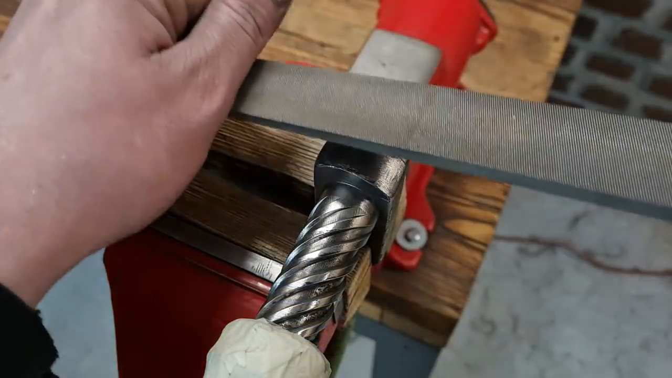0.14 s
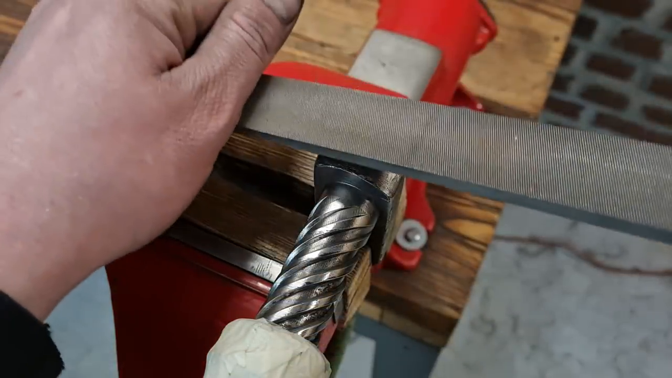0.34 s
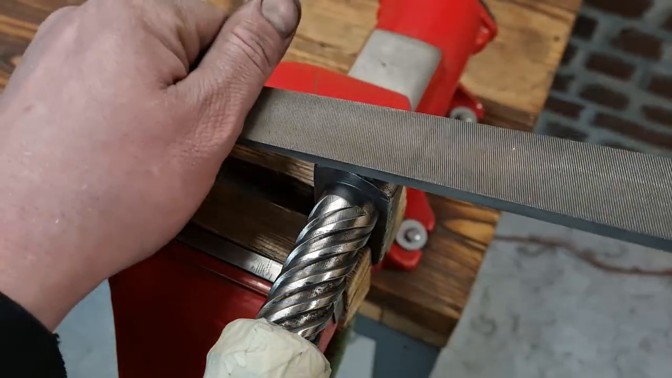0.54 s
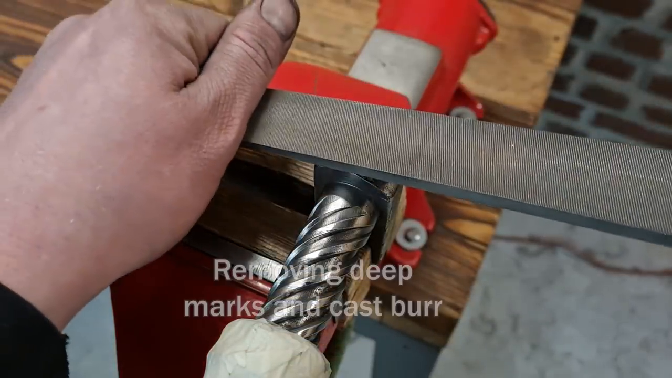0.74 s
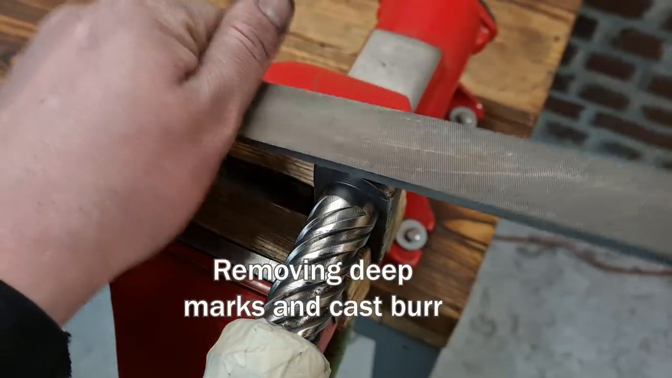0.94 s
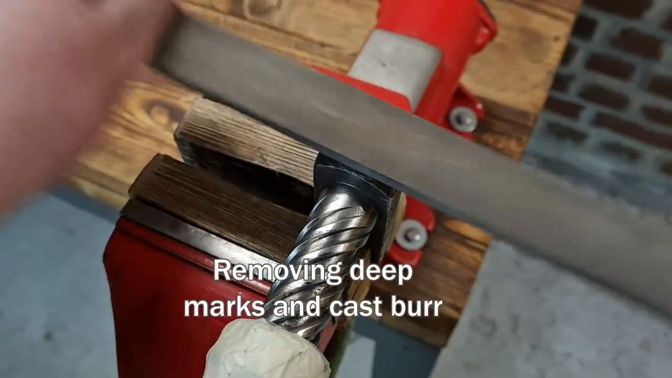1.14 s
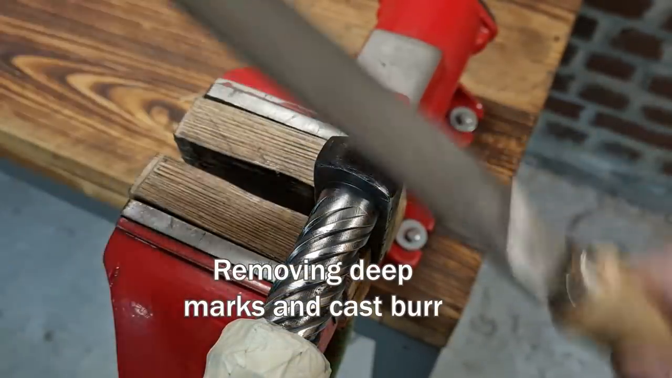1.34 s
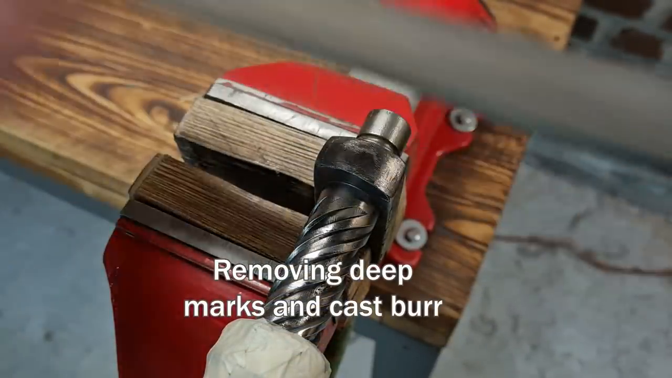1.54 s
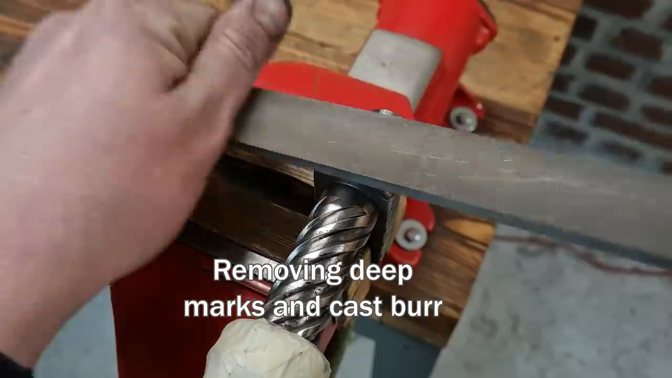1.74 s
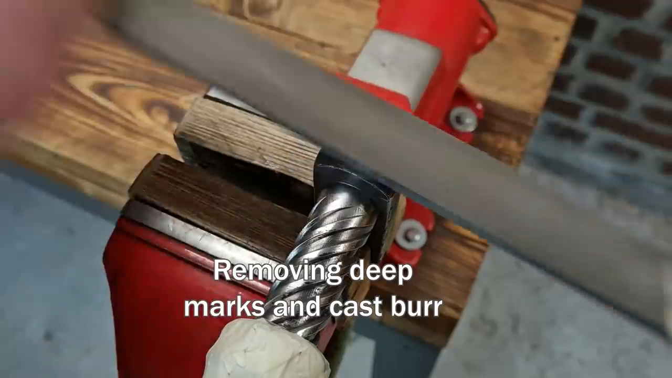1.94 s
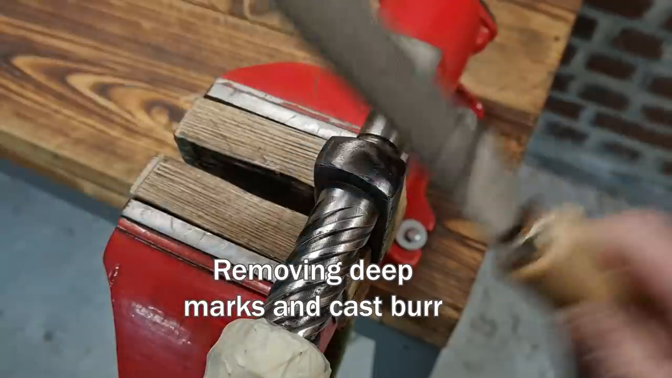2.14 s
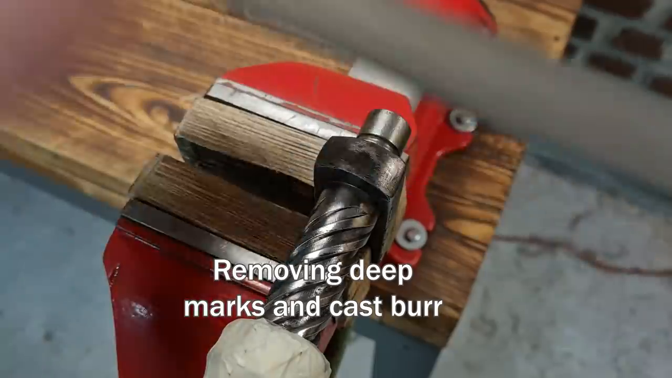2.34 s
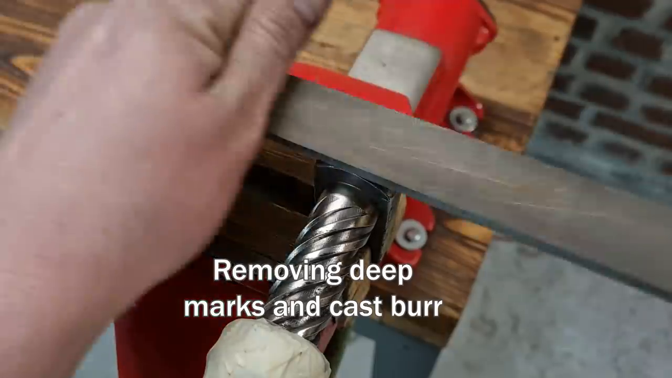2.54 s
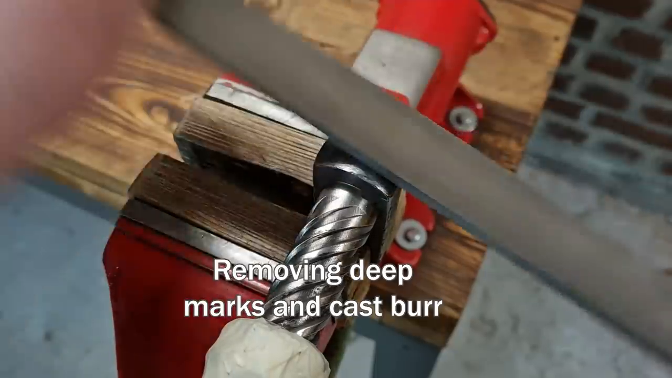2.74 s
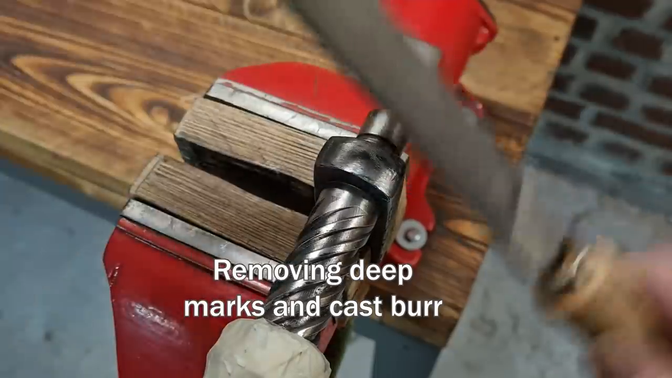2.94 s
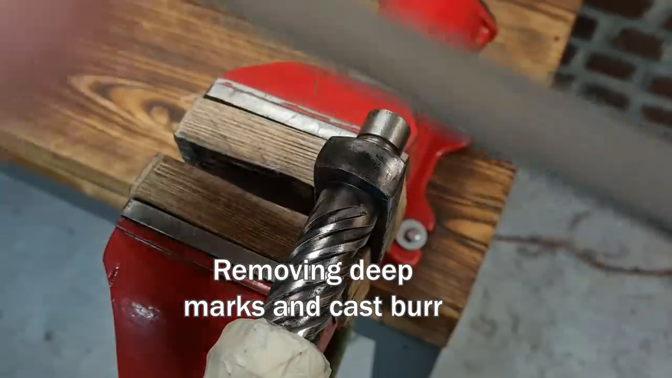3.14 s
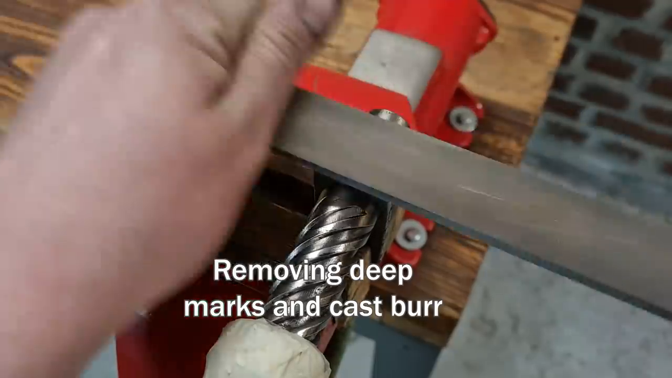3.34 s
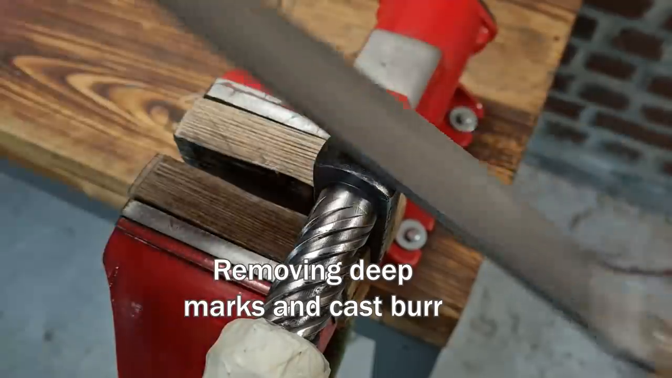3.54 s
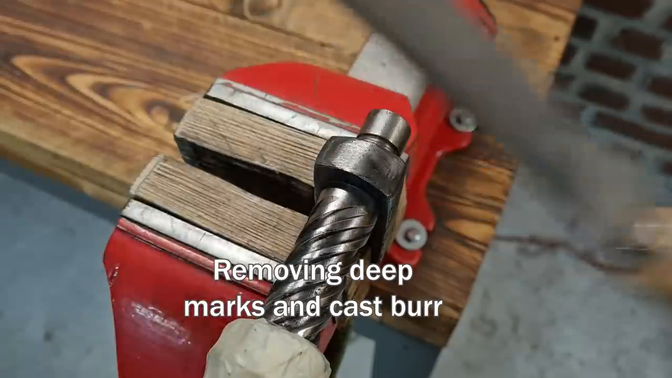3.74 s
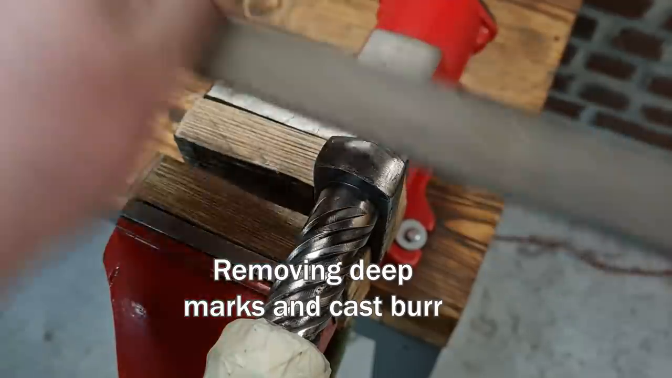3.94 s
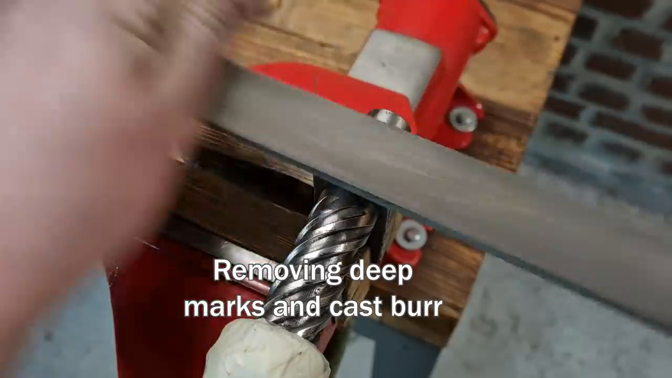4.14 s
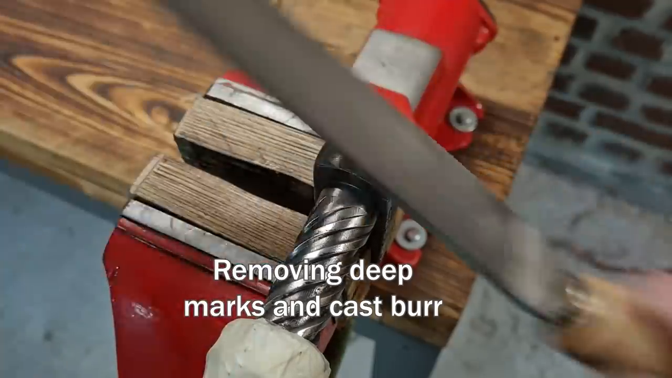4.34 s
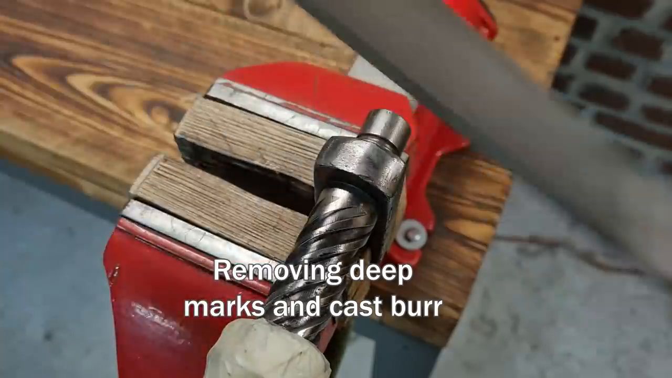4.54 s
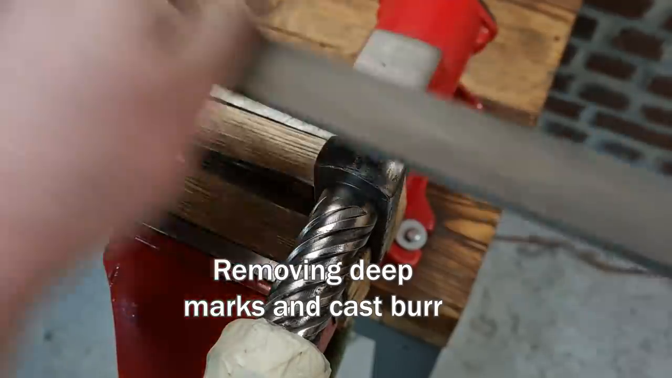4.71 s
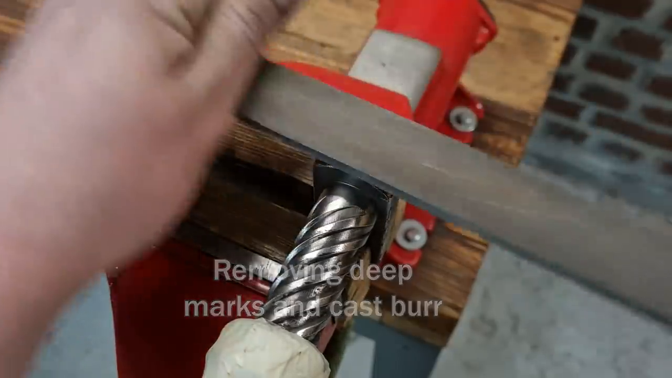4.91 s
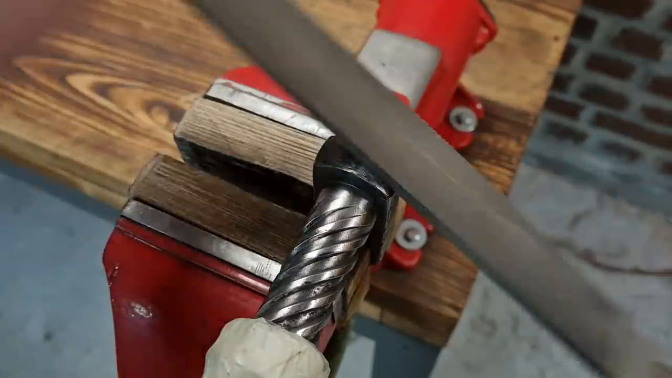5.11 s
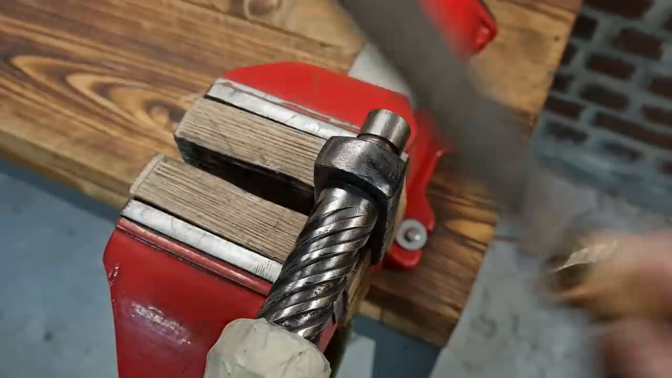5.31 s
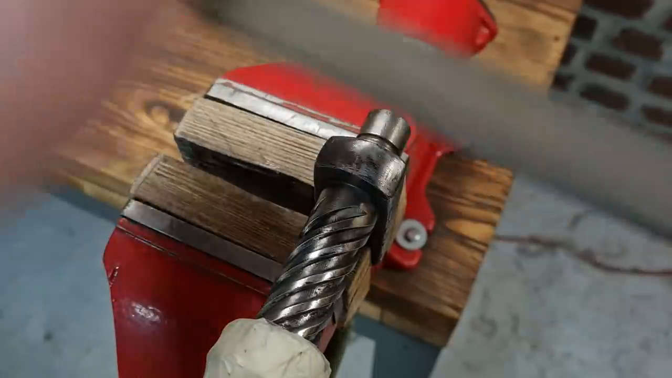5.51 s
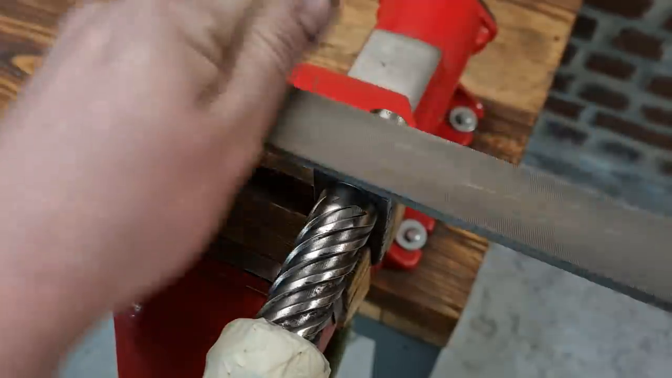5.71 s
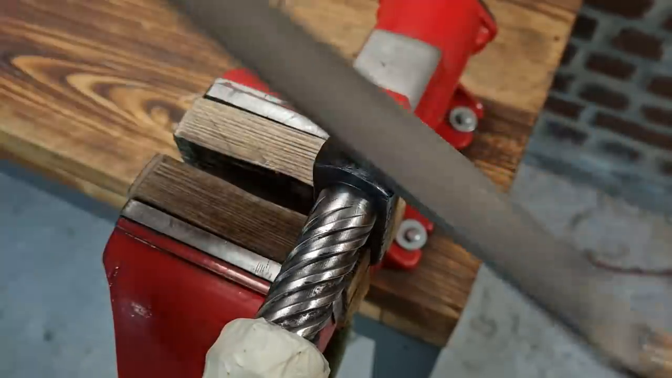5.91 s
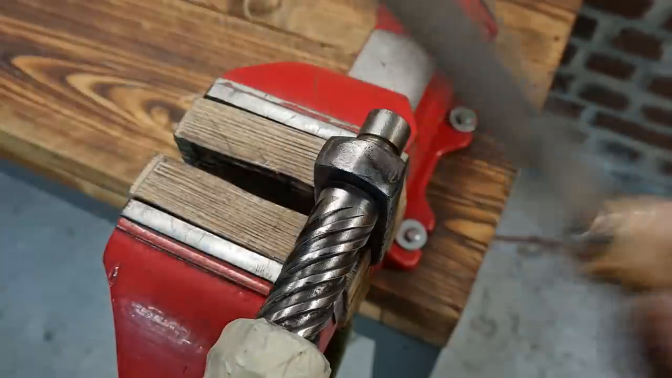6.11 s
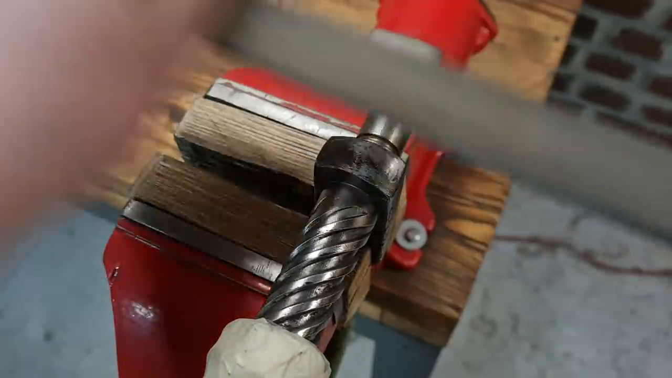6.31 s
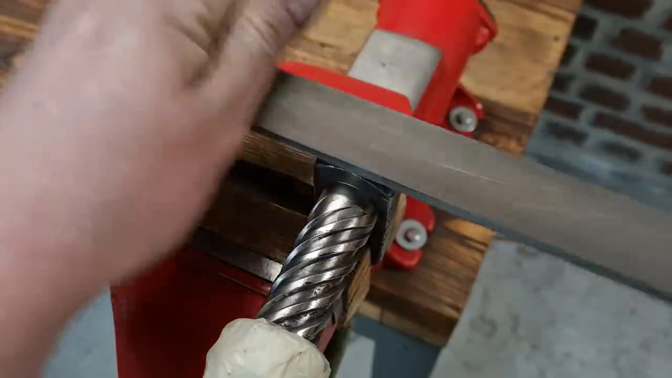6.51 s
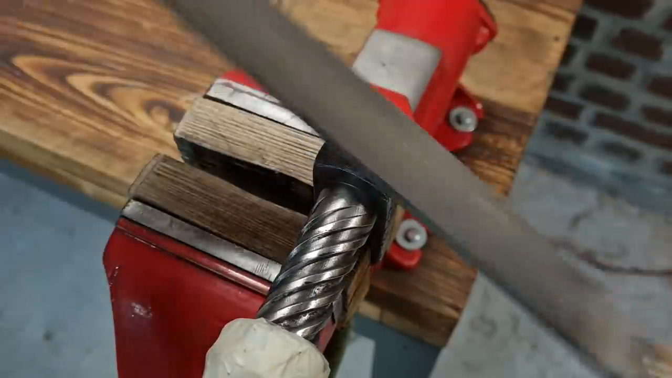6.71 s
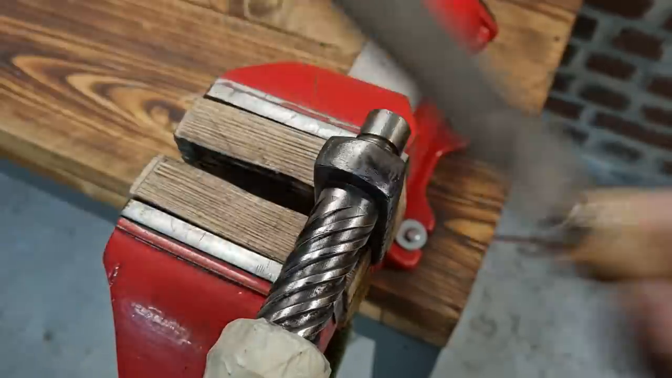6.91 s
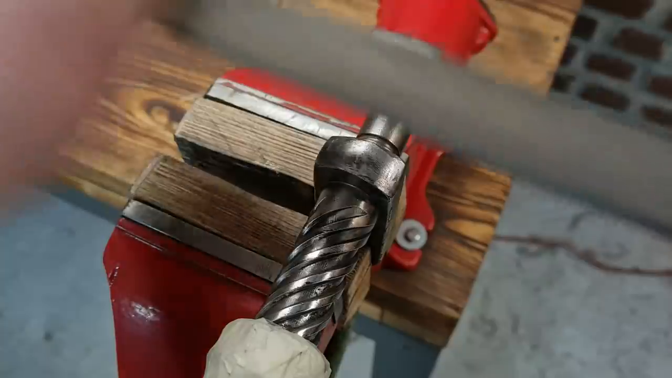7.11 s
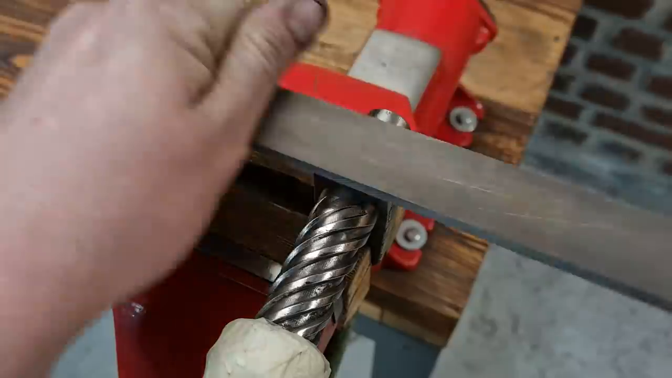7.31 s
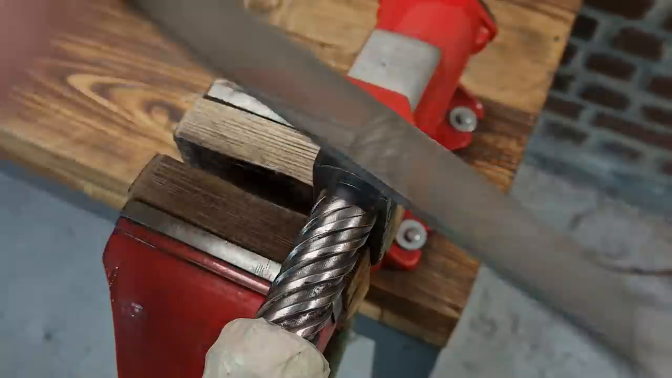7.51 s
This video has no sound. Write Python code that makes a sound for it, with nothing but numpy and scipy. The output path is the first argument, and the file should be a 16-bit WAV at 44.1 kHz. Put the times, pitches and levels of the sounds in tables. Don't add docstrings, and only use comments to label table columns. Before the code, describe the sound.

A flat steel file clacks down on a clamped metal part and rasps across it in nine evenly spaced pushes, close up in a workshop.

```python
import sys
import numpy as np
from scipy import signal
from scipy.fft import rfft, irfft, next_fast_len
from scipy.io import wavfile
from scipy.ndimage import uniform_filter1d, map_coordinates

SR = 44100
rng = np.random.default_rng(int(sys.argv[2]) if len(sys.argv) > 2 else 0)


def nominal_scale(level):
    x = np.asarray(level, float) / 20
    return 10 ** x


def log_audio(samples):
    frames = np.atleast_2d(samples).T
    limited = np.clip(frames, -1, 1)
    pcm = np.round(limited * 32767).astype(np.int16)
    wavfile.write(sys.argv[1], SR, pcm)


N = 333396


def unit(x):
    return x / np.sqrt(np.mean(x ** 2) + 1e-20)


def along(points, hz):
    f, v = np.transpose(points)
    return np.interp(np.log(hz + 1), np.log(f + 1), v)


def filtered(x, response):
    n = x.shape[-1]
    m = next_fast_len(n + min(n, SR // 2))
    return irfft(rfft(x, m) * response(np.fft.rfftfreq(m, 1 / SR)), m)[..., :n]


def causal(points):
    grid = np.linspace(0, 1, 129)
    doubled_db = 2 * along(points, grid * SR / 2)
    return signal.minimum_phase(signal.firwin2(255, grid, nominal_scale(doubled_db)))


# f/Hz, phase/rad
PORT_LAG = [(60, 0.36), (130, 0.31), (300, 0.087), (700, 1.1), (1500, 1.78), (3000, 3.47)]


def modes(table, scatter_db=0):
    late = rng.permuted(np.tile([0, 1], (len(table), 1)), axis=1)
    gains = nominal_scale(scatter_db * rng.standard_normal((len(table), 2, 1)))

    def response(hz):
        f = hz[hz < 10 * max(table)[0]]
        total = 0
        for k, (centre, width, db) in enumerate(table):
            bell = 1j * f * width / (centre ** 2 - f ** 2 + 1j * f * width)
            early = (-1) ** k * nominal_scale(db) * bell
            delayed = early * np.exp(-1j * along(PORT_LAG, centre) * f / centre)
            total = total + gains[k] * np.array([early, delayed])[late[k]]
        fade = np.cos(np.pi / 2 * f / f[-1]) ** 2
        return np.pad(total * fade, [(0, 0), (0, len(hz) - len(f))])
    return response


def driven(force, gain, response):
    reference = np.std(filtered(force[..., 3 * SR:4 * SR], response))
    return filtered(force * gain, response) / reference


def patchy(x, depth_db, tall, long, climb=0):
    z = signal.stft(x, nperseg=256)[2]
    field = rng.standard_normal(z.shape[-2:])
    field = uniform_filter1d(uniform_filter1d(field, tall, 0), long, 1)
    rows, steps = np.indices(field.shape)
    field = field[(rows - (climb * steps).astype(int)) % len(rows), steps]
    return signal.istft(z * nominal_scale(depth_db * unit(field)), nperseg=256)[1][..., :N]


def swept(x, centre_hz, width_hz, lift_db):
    hz, t, z = signal.stft(x, SR, nperseg=256)
    centre = centre_hz[np.minimum((t * SR).astype(int), N - 1)]
    lift = nominal_scale(lift_db / (1 + ((hz[:, None] - centre) / width_hz) ** 2))
    return signal.istft(z * lift, nperseg=256)[1][..., :N]


def grit(spread_db):
    size = nominal_scale(spread_db * rng.standard_normal(N))
    return unit(rng.standard_normal((2, N)) * size)


def spans(table):
    t = np.arange(N) / SR
    start, length = np.transpose(table)[:2]
    row = np.maximum(np.searchsorted(start, t) - 1, 0)
    share = (t - start[row]) / length[row]
    touching = ((share >= 0) & (share < 1)) * 1.
    return uniform_filter1d(touching, size=400), row, np.clip(share, 0, 1)


# f/Hz, level/dB
AIR_COLOUR = [(15, -33), (25, -5.5), (87, 2.5), (166, -19.5), (293, -9.5), (659, -30.5), (1400, -27.5),
              (1520, -26.5), (4030, -33), (7110, -19), (8360, -31.5), (11600, -25.5), (12500, -35),
              (16000, -39)]
# t/s, level/dB
HUSH = [(0, -1), (0.138, -2.5), (.32, 2), (.45, -15), (0.521, -21), (.62, 8), (1.6, 0), (1.72, -4.5),
        (7.56, -4)]


def air():
    pair = rng.standard_normal((2, N))
    level_db = -74.5 + np.interp(np.arange(N) / SR, *np.transpose(HUSH))
    noise = patchy(pair + pair[0], 1.1, 3, 20)
    return nominal_scale(level_db) * unit(filtered(noise, lambda f: nominal_scale(along(AIR_COLOUR, f))))


# f/Hz, t60/s
DECAY = [(60, 0.92), (300, 0.57), (1000, 0.36), (4000, 0.34), (12000, 0.39)]
# f/Hz, level/dB
WALL_RETURN = [(100, -0.5), (1000, 2.5), (2200, -6), (4000, -10.5), (8000, -12), (14000, -22)]


def workshop(x):
    out, step = np.zeros((2, N + 2 * SR)), SR // 4
    for start in range(0, N, step):
        hz, t, z = signal.stft(rng.standard_normal((2, SR // 2)), SR, nperseg=256)
        tail = signal.istft(z * nominal_scale(-60 * t / along(DECAY, hz)[:, None]), SR, nperseg=256)[1]
        tail = tail / np.linalg.norm(tail[0])
        wet = signal.fftconvolve(x[:, start:start + step], tail, axes=1)
        out[:, start + 260:][:, :wet.shape[1]] += wet
    out = out[:, :N]
    side = out.mean(0) - out
    out = out + filtered(side, lambda f: 1 / (1 + (f / 450) ** 2))
    return filtered(out, lambda f: nominal_scale(along(WALL_RETURN, f)))


# t/s, length/s, rub level/dB, creak level/dB, swell over the rest/dB
RESTS = [
    (0.203, 0.4, -75, -73.5, 11),
    (0.61, 0.27, -68, -73, -12.5),
    (0.916, 0.068, -71, -80, 5.5),
    (1.668, 0.092, -84, -79, 2.5),
    (7.231, 0.045, -65.5, -58, 8),
]
# f/Hz, width/Hz, level/dB
RUB = [(1500, 300, 12), (2072, 290, 1.2), (2550, 220, 12)]
# f/Hz, width/Hz, level/dB
CREAK = [(230, 130, -8.5), (310, 39, 5.5), (430, 72, -0.5), (553, 230, -14.5)]


def resting():
    touch, row, share = spans(RESTS)
    rub_db, creak_db, swell_db = np.transpose(RESTS)[2:, row]
    gain = touch * nominal_scale(swell_db * (share - 0.5))
    steel = modes(RUB)
    rub_force = patchy(grit(spread_db=4.5), 2.5, 3, 16)
    rub = driven(rub_force, gain * nominal_scale(rub_db), lambda f: steel(f) ** 2)
    creak_force = patchy(grit(spread_db=0)[0], 4.7, 2, 16)
    return rub + driven(creak_force, gain * nominal_scale(creak_db), modes(CREAK))


# f/Hz, level/dB
CLICK = [(150, -40.5), (1200, -7), (2200, 3), (5000, 8.5), (7500, 0.5), (9000, -20.5), (13000, -46.5),
         (22000, -77.5)]
# f/Hz, level/dB
EDGE = [(5000, -39.5), (9000, -11), (12800, 6.5), (15500, -4), (17000, -37), (22000, -54)]
# f/Hz, width/Hz, level/dB
LOOSE = [(1363, 67, 19), (2140, 160, -3.5), (2410, 99, 0.5), (3770, 140, 2), (4628, 50, -5), (5250, 180, 1),
         (5510, 66, -4), (5870, 120, -13.5), (7000, 71, 12.5)]


def contacts(table, first, crack_s, ring_db, centre_db):
    crack = np.zeros((2, N + SR))
    t = np.arange(4000) / SR
    body, edge = causal(CLICK), causal(EDGE)

    def peak(x):
        return x / np.abs(x).max(1, keepdims=True)

    for s, db, pan_db, hz, edge_db in table:
        burst = rng.standard_normal((2, len(t))) + first * (t == 0)
        burst = burst * nominal_scale(-60 * t / crack_s)
        ring = modes(LOOSE + [(hz, 190, centre_db)], scatter_db=3)
        click = peak(signal.lfilter(body, 1, burst + nominal_scale(ring_db) * filtered(burst, ring)))
        sparkle = rng.standard_normal((2, len(t))) * nominal_scale(-60 * t / 0.024)
        click += nominal_scale(edge_db) * peak(signal.lfilter(edge, 1, sparkle))
        pan = np.array([[.5], [-.5]]) * pan_db
        crack[:, round(s * SR):][:, :len(t)] += nominal_scale(db + pan) * click
    return crack[:, :N]


# t/s, peak level/dB, left-right/dB, bright centre f/Hz, edge level re peak/dB
SCUFFS = [
    (0.74, -51.5, -11, 6800, -10),
    (0.862, -64, -14, 4850, 3),
]
TICKS = [
    (0.197, -59.5, -29.5, 2170, -4),
    (0.2194, -90, -4, 4050, -19),
    (0.2985, -46, -7.5, 2147, -11),
    (0.3194, -75, -11, 2430, -21),
    (0.634, -45.5, -7, 5200, -10),
    (0.6554, -47, -5, 4040, -7),
    (0.6804, -47.5, 3, 2300, -7),
    (4.6842, -67.5, -1, 7350, 6),
    (4.6964, -72, 10.5, 7300, -6),
    (7.2396, -68.5, -7, 2860, -15),
]
TAP = [
    (0.5352, -17.5, -16, 2240, -25),
]


def light_touches():
    touches = contacts(SCUFFS, first=0, crack_s=0.12, ring_db=8, centre_db=15)
    touches += contacts(TICKS, first=0.6, crack_s=0.022, ring_db=-6, centre_db=16)
    return touches + contacts(TAP, first=5.9, crack_s=0.007, ring_db=0, centre_db=27)


# t/s, peak level/dB, left-right/dB, bright centre f/Hz, edge level re peak/dB
LANDINGS = [
    (1.7394, -5.5, -9.5, 4300, -19.5),
    (2.5365, -7, -1, 3530, -30),
    (3.3157, -6.5, -2.5, 2300, -33),
    (4.0704, -5.5, -6, 4420, -18),
    (4.8246, -5.5, -3.5, 2310, -40.5),
    (5.664, -4, 8.5, 7000, -32),
    (6.4473, -5.5, -5, 6730, -36),
    (7.2818, -11, -12.5, 2360, -30),
]


def landings():
    return contacts(LANDINGS, first=5, crack_s=0.008, ring_db=6, centre_db=4)


# t/s, level/dB
KNOCKS = [
    (0.5352, -12),
    (0.197, -70),
    (0.2985, -66),
    (0.6554, -26.5),
    (7.2396, -42),
]
# f/Hz, width/Hz, level/dB
PART = [(509.4, 32, -12.5), (529.5, 11, -1), (577, 82, -4), (662.6, 37, -4), (729, 20, -4.5),
        (762.5, 5.2, -4.5), (835.5, 73, -10), (1170.5, 53.4, -6), (1374.5, 39.5, -4.5), (1530, 58, -0.5),
        (1648, 49, -9.5), (1880, 360, -14.5)]
# f/Hz, width/Hz, level/dB
BENCH = [(123.3, 5.1, 3), (174.3, 4.3, -9.5), (197.7, 22, -11.5), (227.4, 7, -7.5), (239.6, 6.3, -3.5),
         (266.4, 9, 0), (306.2, 12, -5.5), (352, 19.5, -7.5)]


def thuds():
    thud, t = np.zeros(N + SR), np.arange(2000) / SR
    for s, db in [(row[0], -5) for row in LANDINGS] + KNOCKS:
        thud[round(s * SR):][:len(t)] += nominal_scale(db - 60 * t / 0.044) * rng.standard_normal(len(t))
    part, bench = modes(PART), modes(BENCH)

    def body(f):
        bass_cut = (1j * f / (1j * f + 300)) ** 3
        return part(f) + nominal_scale(16.5) * bench(f) * bass_cut

    ring = filtered(np.arange(SR) == 0, body)
    return signal.fftconvolve(thud[None, :N], ring, axes=1)[:, :N]


# t/s, length/s, hardest effort level/dB, swell up to it/dB, share where hardest (0-1)
STROKES = [
    (0.982, 0.36, -32.5, 14, 1),
    (1.749, .38, -28, 14, 1),
    (2.547, 0.39, -34.5, 5, 1),
    (3.322, 0.34, -29.5, 5.5, 0.8),
    (4.073, 0.34, -29, 7, .45),
    (4.827, 0.44, -36, 11, 1),
    (5.674, 0.37, -33, 2, 1),
    (6.456, 0.39, -30, 6.5, 1),
    (7.286, 0.5, -32.5, 8, 0.7),
]
# jolt at the start/dB, part level/dB, bench level/dB, sway level/dB, left-right/dB
LOADS = [
    (-9, -31.5, -41, -43.5, -2),
    (10.5, -30.5, -37, -44.5, -1),
    (-1, -32, -39, -44.5, -2),
    (-8.5, -32, -34.5, -49.5, -1.5),
    (11.5, -29.5, -37.5, -45.5, -1.5),
    (2, -30.5, -38, -41, -1),
    (5, -33, -33, -47.5, -1.5),
    (5, -33, -36, -43, -1.5),
    (5, -34.5, -37.5, -42, -1),
]
# t/s, length/s, blade level/dB, part level/dB, bench level/dB
SURGES = [(1.044, 0.051, 9.5, 4, 2), (1.191, 0.073, 0, 1, 5.5), (1.284, 0.058, 4, 4.5, -3.5),
          (1.766, 0.033, 3, -5, 4.5), (1.935, 0.055, 4, 6.5, 3), (2.07, .035, 1, 5.5, -0.5),
          (2.701, 0.07, 1.5, 0, -3.5), (3.431, 0.038, 1.5, 10, -2), (3.629, 0.019, 4, 14.5, -4.5),
          (4.094, .03, 2.5, -3, 3.5), (4.277, 0.029, 3.5, 6, -3), (4.39, 0.025, -5.5, -3.5, 4),
          (5.099, 0.08, 3, -2, 6), (5.208, 0.029, 3, 3, -6.5), (5.803, .05, -0.5, 1, -2),
          (6.574, 0.062, -4, 4.5, -3), (6.712, 0.021, -8, 6.5, 7), (6.838, .025, -5, 7, 0),
          (7.48, 0.062, 0, 6, -3.5)]
# share of the push (0-1), f/Hz
TRAVEL = [(0, 4170), (.3, 4537), (.55, 3350), (1, 5130)]


def effort():
    touch, row, share = spans(STROKES)
    _, length, top_db, swell_db, hardest = np.transpose(STROKES)[:, row]
    jolt_db, part_db, bench_db, sway_db, pan_db = np.transpose(LOADS)[:, row]
    hardest = np.clip(hardest, .1, .97)
    lean_in_db = -swell_db * (1 - share / hardest)
    ease_off_db = -6.5 * (share - hardest) / (1 - hardest)
    lean_db = np.where(share < hardest, lean_in_db, ease_off_db)
    since_s = share * length
    jolt_db = jolt_db * np.exp(-since_s / 0.012)

    blade_db = top_db + lean_db + jolt_db
    part_db = part_db + 0.69 * lean_db + jolt_db
    bench_db = bench_db + 0.067 * lean_db + jolt_db
    sway_db = sway_db + 0.29 * lean_db + np.minimum(jolt_db, 0)
    scratch_db = top_db - 5.5 + 1.1 * lean_db + 0.21 * jolt_db
    scratch_db += 6 * (share - 1)
    scratch_db -= 12 * np.exp(-since_s / 0.07)
    shank_db = part_db - 5

    t = np.arange(N) / SR
    blade, part, bench = sum(np.outer(db, np.exp(-((t - s) / span) ** 2)) for s, span, *db in SURGES)
    levels_db = np.array([blade_db, part_db, bench_db, sway_db, scratch_db, shank_db])
    levels_db += np.array([blade, part, bench, bench, blade, 0.53 * part])
    return touch * nominal_scale(levels_db), pan_db, np.interp(share, *np.transpose(TRAVEL))


# t/s, length/s, tooth rate f/Hz, level over the usual catch/dB
BITES = [(1.03, 0.081, 593.3, 14), (1.93, 0.054, 601.1, 11.5), (2.11, .03, 720, 11),
         (2.79, 0.1, 544.3, 21.5), (3.45, .04, 601.7, 10.5), (4.3, 0.056, 609.5, 4.5),
         (5.17, .05, 570, 8.5), (5.25, .03, 720, 15.5), (5.81, .05, 636.4, 20.5), (5.93, .04, 600, 0.5),
         (6.03, .02, 720, 22.5), (6.65, .05, 588.2, 10), (7.45, 0.086, 608.5, 20)]


def teeth():
    t = np.arange(N) / SR
    rate_hz = np.interp(t, *np.transpose(BITES)[[0, 2]])
    drift = map_coordinates(rng.standard_normal(900), [np.linspace(0, 899, N)], order=1)
    count = np.cumsum(rate_hz * (1 + 0.05 * drift)) / SR
    catches = np.diff(np.floor(count), prepend=0) * nominal_scale(3 * rng.standard_normal(N))
    bite_db = -5.5 + sum(db * np.exp(-((t - s) / length) ** 2) for s, length, _, db in BITES)
    return unit(uniform_filter1d(catches, size=24)), nominal_scale(bite_db)


# f/Hz, width/Hz, level/dB
LEGS = [(54, 18, -1), (75, 7.4, -4)]
# f/Hz, width/Hz, level/dB
BLADE = [(2470, 70, -1), (3390, 520, -2), (4200, 200, -4), (5150, 200, -6), (6980, 80, -5)]
# f/Hz, level/dB
RASP = [(1500, -47.5), (2000, -10), (3500, -13), (6000, -14), (7800, -20.5), (9000, -55.5)]
# f/Hz, level/dB
SCRATCH = [(4710, 1.5), (8000, -5.5), (8220, -3.5), (9220, -12), (9640, -6), (10600, 1.5), (11700, -3),
           (12700, 4), (14200, -8), (14700, -4), (15500, -2.5), (15700, -3), (16200, -14)]


def filing():
    gains, pan_db, sweep_hz = effort()
    blade_gain, part_gain, bench_gain, sway_gain, scratch_gain, shank_gain = gains
    catches, bite_gain = teeth()
    chips = grit(spread_db=2.5) * (1 + 0.34 * catches)
    shared = chips[0]

    sway = driven(shared, sway_gain * nominal_scale(7.5), modes(LEGS))
    bench = driven(patchy(shared, 3.6, 2, 14), bench_gain * nominal_scale(-2.5), modes(BENCH))

    shake = patchy(shared, 4.5, 2, 18)
    bite = bite_gain * catches
    part = driven(shake + 0.11 * bite, shank_gain, modes(PART[:7]))
    part = part + driven(shake + 0.062 * bite, part_gain, modes(PART[7:]))

    steel = modes(BLADE)
    rasp = patchy(0.9 * shared + 0.6 * chips, 5.6, 4, 20, climb=0.13)
    rasp = swept(rasp, sweep_hz, width_hz=400, lift_db=8)
    blade = driven(rasp, blade_gain, lambda f: 0.71 * steel(f) + nominal_scale(along(RASP, f)))

    hiss = patchy(0.092 * shared + 0.8 * chips, 5, 5, 16, climb=0.08)
    scratch = driven(hiss, scratch_gain, lambda f: nominal_scale(along(SCRATCH, f)))
    pan = nominal_scale(np.outer([.5, -.5], pan_db))
    return sway + bench + (part + blade + scratch) * pan


def scene():
    near = resting() + light_touches() + landings() + thuds() + filing()
    return air() + workshop(near) + near


# f/Hz, left-right/dB
SIDEWAYS = [(300, -0.5), (800, 3.5), (1500, 2.5), (2800, -8), (5000, -3), (9000, -5), (14000, 0)]


def microphone(dry):
    ports = filtered(dry, lambda f: nominal_scale(np.outer([.5, -.5], along(SIDEWAYS, f))))
    ports = ports / (1 + np.abs(ports / .95) ** 6) ** (1 / 6)
    return filtered(ports, lambda f: (1j * f / (1j * f + 30)) ** 8 / (1 + (f / 16500) ** 60))


def roll_off(x):
    return signal.sosfilt(signal.butter(12, 16560, fs=SR, output="sos"), x)


def record(dry):
    mix = microphone(dry)
    return roll_off(mix)


dry = scene()
out = record(dry)
log_audio(out)
```